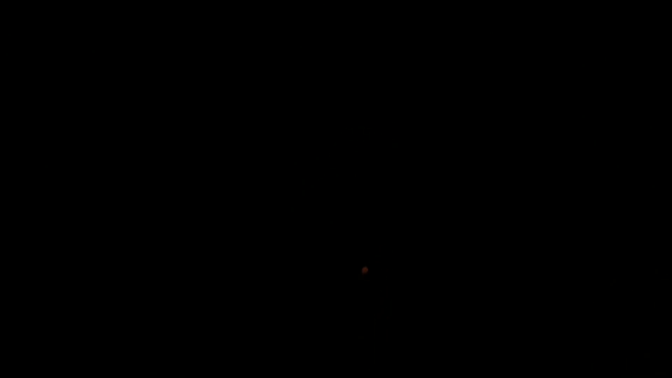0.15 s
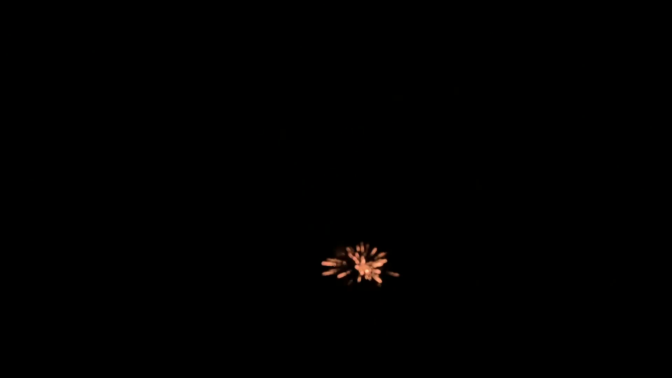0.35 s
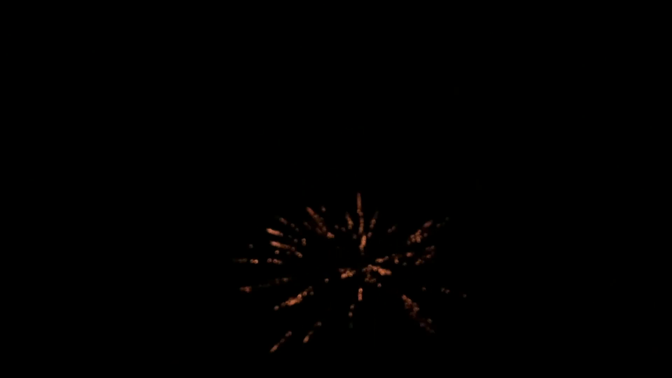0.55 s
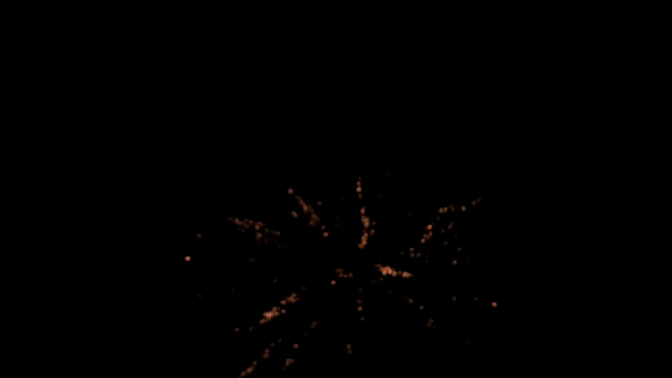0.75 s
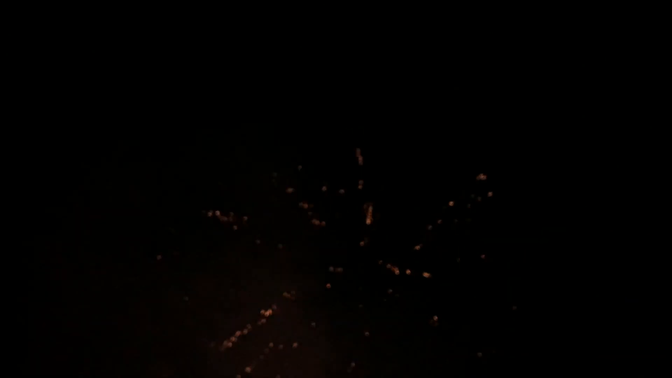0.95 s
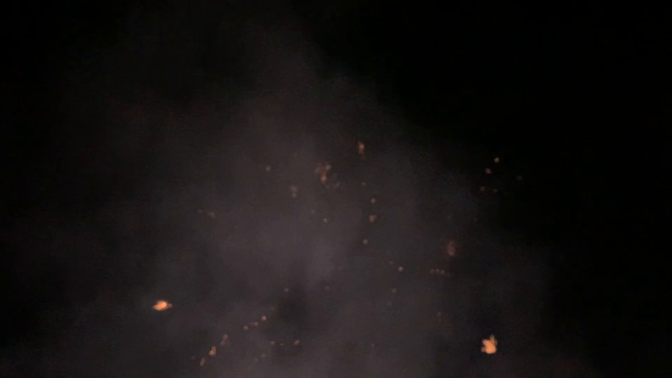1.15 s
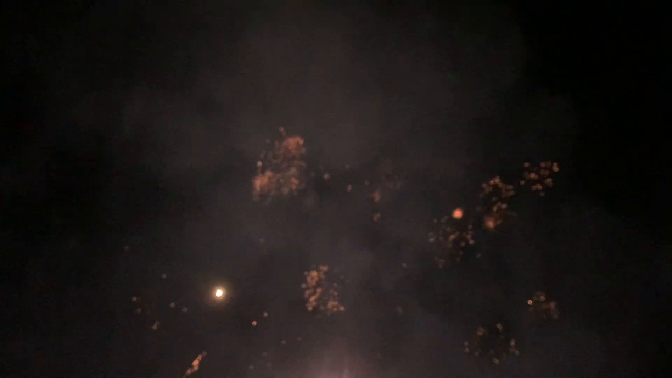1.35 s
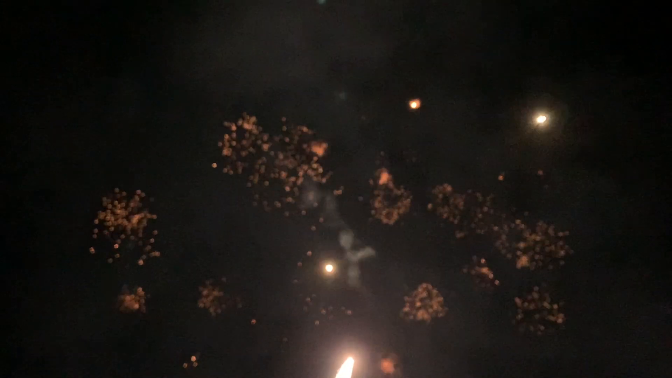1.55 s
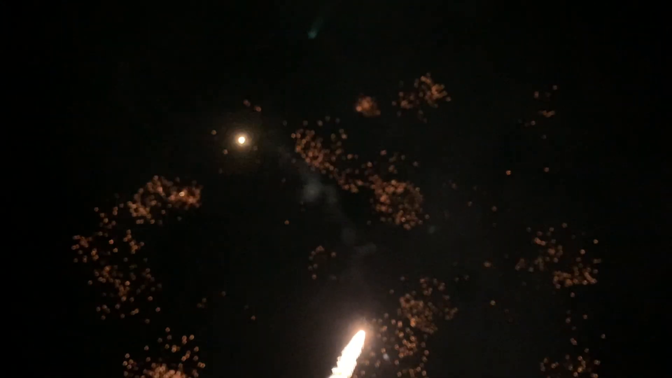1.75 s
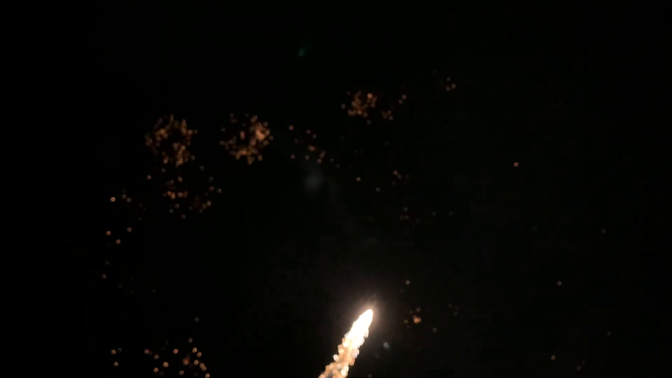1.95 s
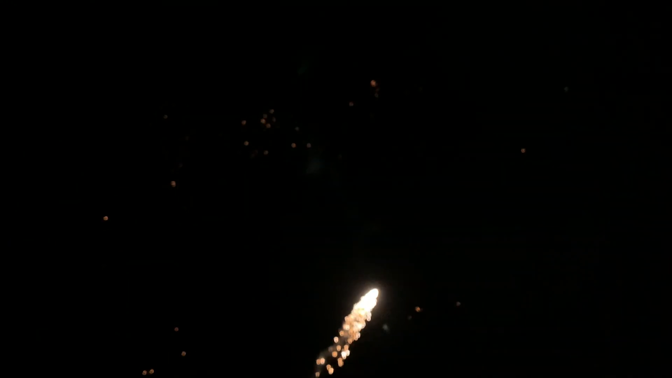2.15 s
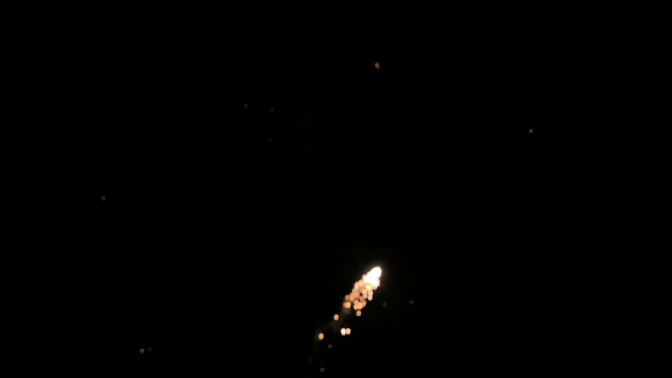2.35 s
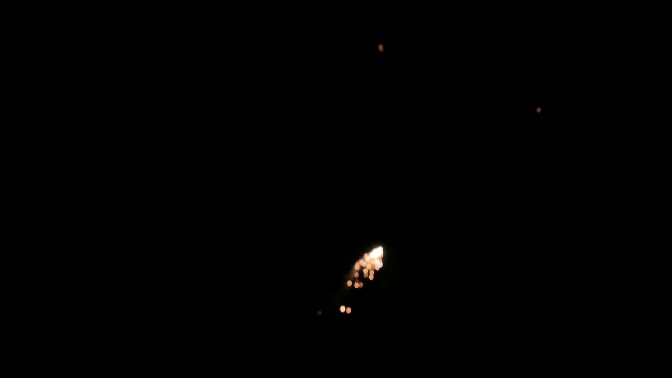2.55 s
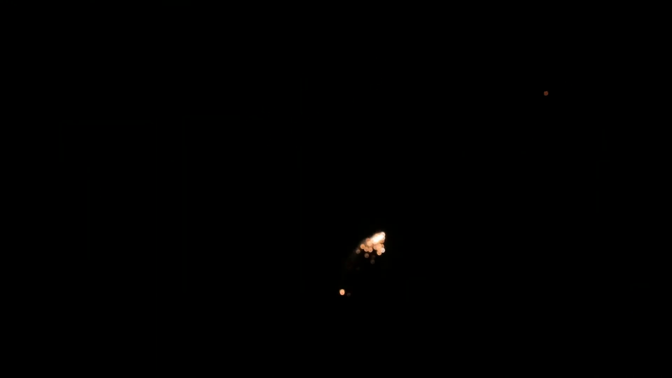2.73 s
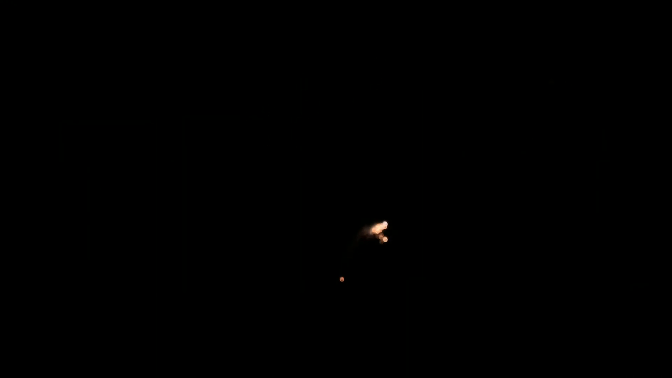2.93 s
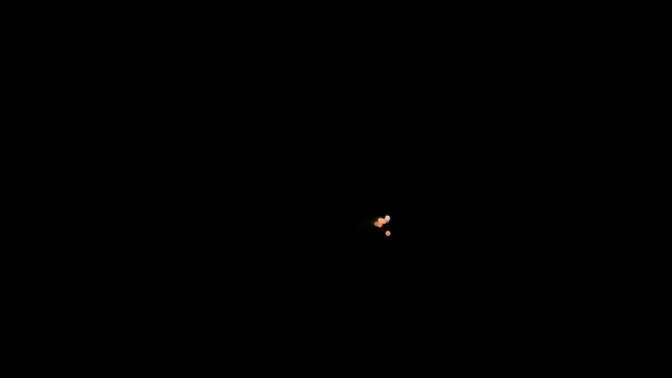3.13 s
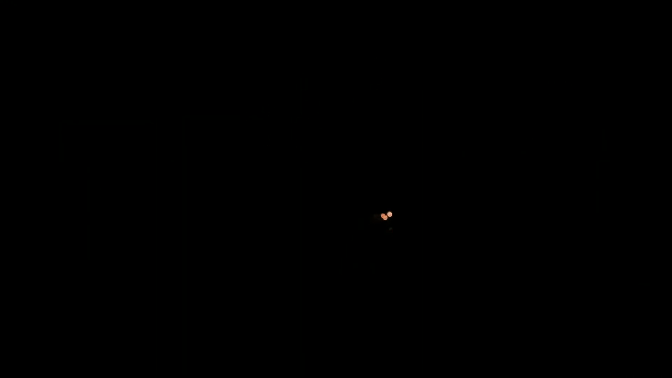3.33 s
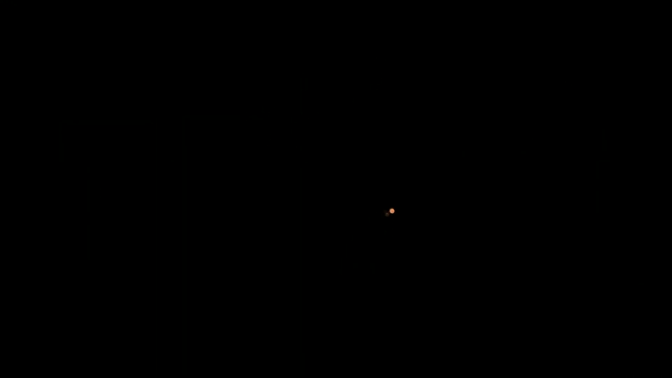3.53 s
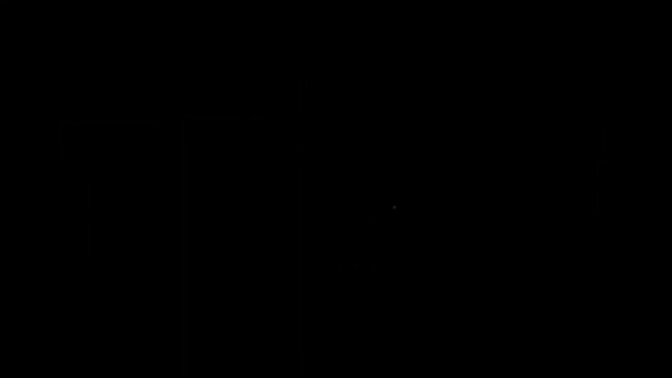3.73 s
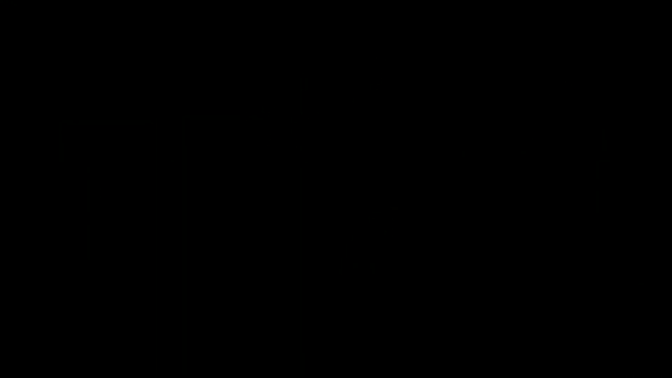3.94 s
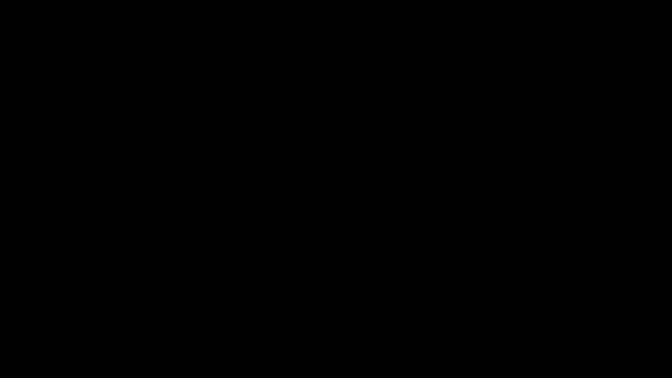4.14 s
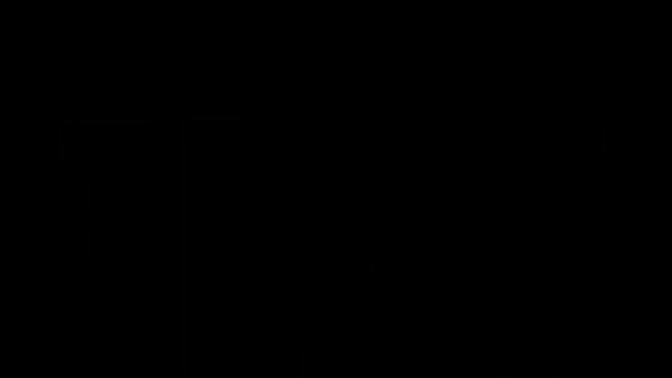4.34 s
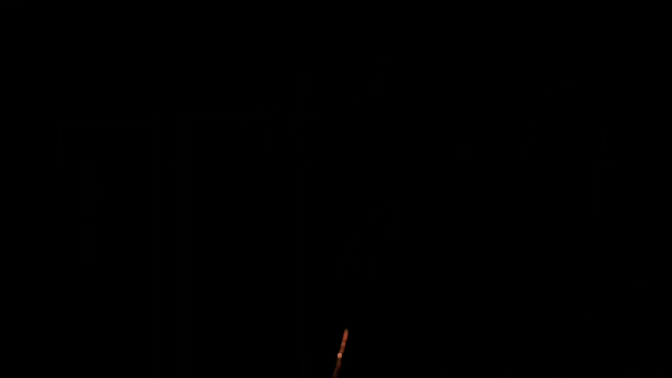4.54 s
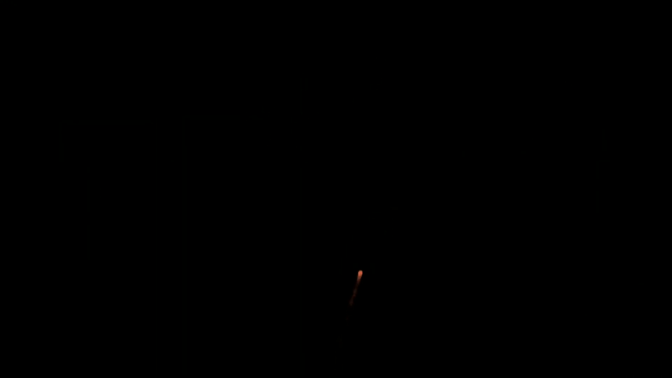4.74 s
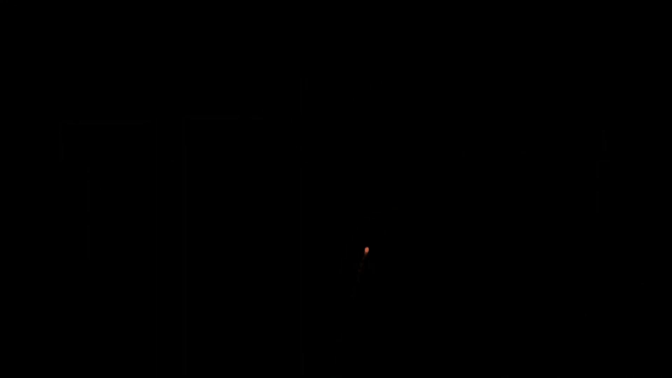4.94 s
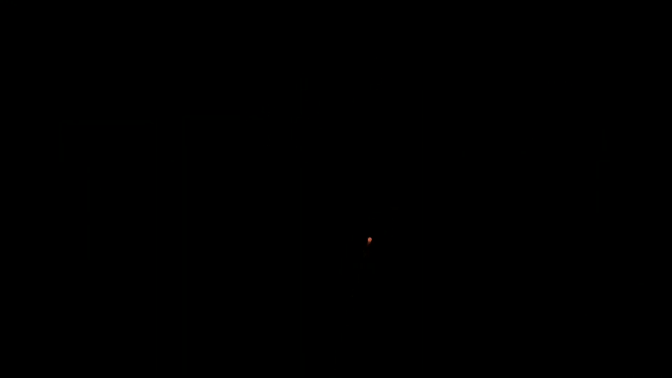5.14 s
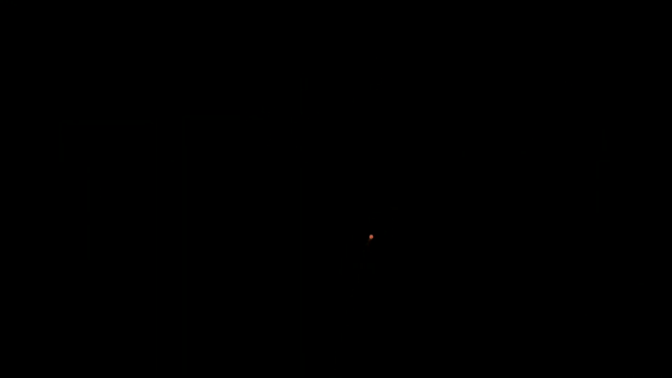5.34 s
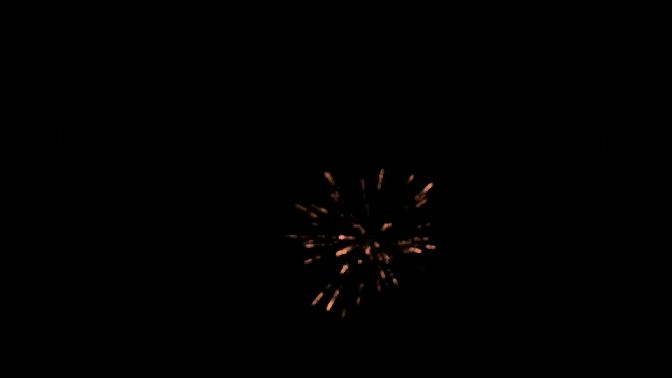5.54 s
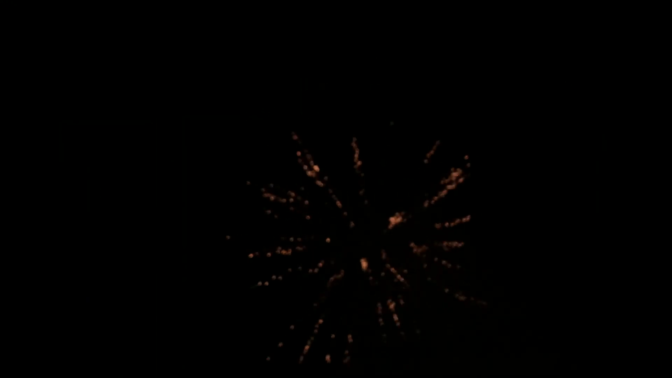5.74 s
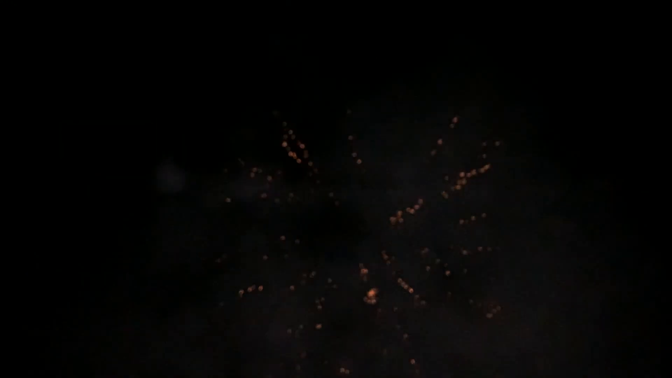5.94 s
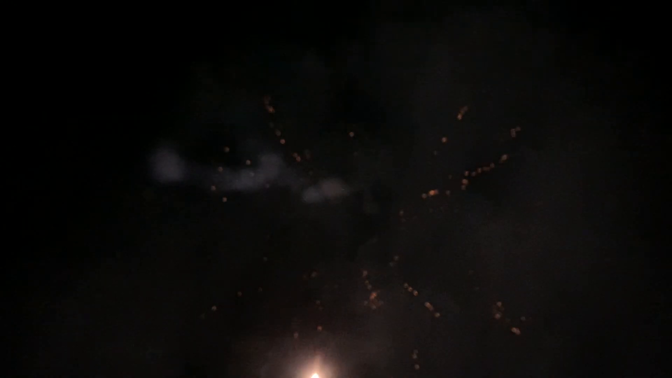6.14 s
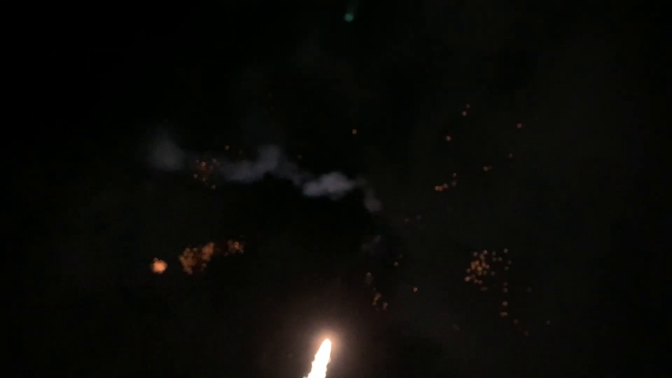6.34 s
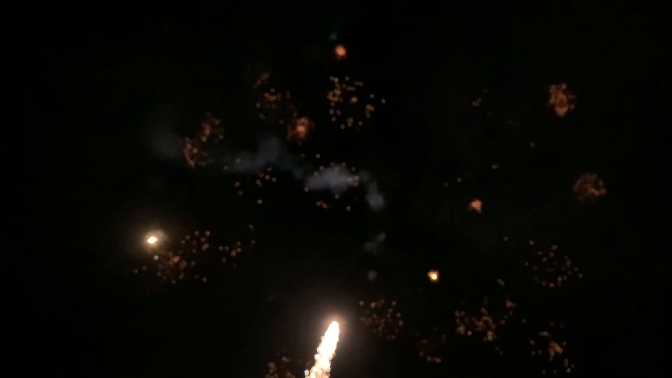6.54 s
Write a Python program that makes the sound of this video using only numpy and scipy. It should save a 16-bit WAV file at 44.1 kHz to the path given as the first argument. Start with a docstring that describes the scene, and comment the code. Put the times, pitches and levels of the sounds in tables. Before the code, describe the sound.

Firework candle at night: sharp overhead bangs and low tube thumps, bursts of dense crackling stars, and echoes rolling away into quiet air.

```python
"""Firework candle at night

A firework candle fires outdoors, close to a stereo microphone: lift charges and comets thump out of tubes.
Shells burst overhead and stars crackle in volleys; each report is a shock pulse, a gas rush and a low ring.
A dull repeat follows at once, then the ground's slap; decaying noise, convolved with the shots, reverberates.
Shaped noise makes the hiss of fuse, embers and sparks, the ticks, the rumble under dull thuds and the night air."""
import sys
import numpy as np
from scipy import signal
from scipy.fft import rfft, irfft, next_fast_len
from scipy.io import wavfile

SR = 44100
rng = np.random.default_rng(int(sys.argv[2]) if len(sys.argv) > 2 else 0)


def int16_out(signal):
    """Quantize to a 16-bit WAV file."""
    q = np.round(np.clip(np.atleast_2d(signal).T, -1, 1) * 32767)
    wavfile.write(sys.argv[1], SR, q.astype(np.int16))


N = 290178
TIME = np.arange(N) / SR
SIZE = 8192  # samples in one short sound
AROUND = (np.arange(SIZE) - SIZE // 2) / SR  # its time axis [s], zero at its centre
HZ = np.fft.rfftfreq(SIZE, 1 / SR)
GROUND_S, REPEAT_S = 0.0117, 0.0022  # delays of the ground echo and of the dull repeat [s]
TOP_HZ = 15900  # upper band limit of the microphone


def undb(db):
    """Level law: 20 dB is a tenfold amplitude."""
    return 10 ** (np.asarray(db) / 20)


def over_hz(hz, points, axis=1):
    """Spectral interpolation: a table column joined by straight lines over log frequency."""
    points = np.array(points)
    return np.interp(np.log(hz + 1), np.log(points[:, 0]), points[:, axis])


def noise(colour, size):
    """Spectral shaping: white stereo noise is filtered to a colour and scaled to rms 1."""
    spectrum = rfft(rng.standard_normal((2, size)))
    x = irfft(spectrum * undb(over_hz(np.fft.rfftfreq(size, 1 / SR), colour)), size)
    return x / x.std()


def strength(x, db):
    """Sound exposure: a short sound gets the energy of one millisecond at this level."""
    energy = np.mean(np.sum(x ** 2, axis=-1))
    return x * undb(db) * np.sqrt(SR / 1000 / energy)


def pulse(gain, db, lag_s=0, pan_db=0, lead_s=0.014):
    """Impulse with a short lead-in, located by interaural time and level differences."""
    ears = np.array([[0.5], [-0.5]])
    delay_s = SIZE / 2 / SR + ears * lag_s
    x = irfft(gain * np.exp(-2j * np.pi * HZ * delay_s))
    lead_in = np.exp(-(np.minimum(AROUND, 0) / lead_s) ** 2)
    return strength(x * lead_in * undb(ears * pan_db), db)


def puff(colour, db, rise_s, fall_s):
    """Turbulence noise: a short random burst swells and fades exponentially."""
    envelope = np.exp(-np.maximum(-AROUND / rise_s, AROUND / fall_s))
    return strength(noise(colour, SIZE) * envelope, db)


def held(start_s, length_s, attack_s, release_s):
    """Envelope: a linear rise, a hold and an exponential release."""
    rise = np.clip((TIME - start_s) / attack_s, 0, 1)
    return rise * np.exp(-np.maximum(TIME - start_s - length_s, 0) / release_s)


def flutter(depth_db, count):
    """Amplitude modulation: the gain wanders through this many random levels over the scene."""
    knots = np.linspace(0, TIME[-1], count)
    return undb(depth_db * np.interp(TIME, knots, rng.standard_normal(count)))


def add(track, s, x):
    """Superposition: a short sound is summed into the track with its centre at s."""
    start = int(round(s * SR)) - SIZE // 2
    a, b = max(start, 0), min(start + SIZE, N)
    if b > a:
        track[:, a:b] += x[:, a - start:b - start]


# Spectrum of the night air: (frequency [Hz], relative level [dB])
AIR_COLOUR = [(25, 5), (70, 8.5), (150, -6), (400, -9), (700, -13.5), (1300, -16), (2500, -26),
              (5000, -27.5), (10000, -33.5), (16000, -43.5)]


def night_air():
    """Ambient noise: the still night air is a steady, coloured random hush."""
    return noise(AIR_COLOUR, N) * undb(-72)


# Fuses of climbing shells: (burst time [s], level [dB])
FUSES = [(.41, -75.5), (5.51, -74)]
# Spectrum of a fuse: (frequency [Hz], relative level [dB])
FUSE_COLOUR = [(200, -9), (400, -3.5), (700, -15.5), (1050, -12), (1350, 4), (1900, -21.5), (3300, -22),
               (4300, -5.5), (5100, -22.5), (6000, -13), (7200, -17.5), (8500, -24), (16000, -32.5)]


def fuses(flutter_db):
    """Combustion noise: a shell's fuse sputters softly through its climb until the burst."""
    flight_s, attack_s, release_s = 1.3, 0.3, 0.03
    burning = sum(undb(db) * held(s - flight_s, flight_s, attack_s, release_s) for s, db in FUSES)
    return noise(FUSE_COLOUR, N) * burning * flutter(flutter_db, count=200)


# Spectrum of a tick: (frequency [Hz], relative level [dB])
TICK_COLOUR = [(100, -12.5), (350, -0.5), (900, -1.5), (2000, -17), (6000, -32), (16000, -53)]


def ticks(spread_db, count):
    """Random impulses: faint dull ticks, one at a random moment in each equal time slot."""
    track = np.zeros((2, N))
    middle_db, from_s, until_s = -64, 1.6, 6.5
    for k, (wait, size) in enumerate(rng.random((count, 2))):
        s = from_s + (until_s - from_s) * (k + wait) / count
        add(track, s, puff(TICK_COLOUR, middle_db + spread_db * (size - 0.5), 0.0006, 0.002))
    return track


# Faint spits of embers: (time [s], level [dB], decay [s])
SPITS = [(2.919, -48.5, 0.0074), (2.941, -54, 0.002), (3.256, -55.5, 0.0028), (3.337, -52.5, 0.036),
         (3.406, -60.5, 0.0044)]
# Spectrum of spits and spark trails: (frequency [Hz], relative level [dB])
SPIT_COLOUR = [(200, -8.5), (1200, 3.5), (2500, -7), (4200, -4.5), (7000, -7), (10000, -23), (16000, -46.5)]


def spits():
    """Transient hiss: embers give noise puffs that rise four times as fast as they decay."""
    track = np.zeros((2, N))
    for s, db, decay_s in SPITS:
        add(track, s, puff(SPIT_COLOUR, db, decay_s / 4, decay_s))
    return track


# Spark trails of what leaves a tube: (start [s], level from which the fade begins [dB])
TRAILS = [(.844, -58.5), (4.183, -52.5), (5.68, -51.5)]


def trails():
    """Fading noise source: sparks sputter behind each shot, weaker as it climbs away."""
    rise_s, fade_db_per_s = 0.2, 40.5
    climb = 0
    for s, db in TRAILS:
        rise = np.clip((TIME - s) / rise_s, 0, 1)
        climb = climb + rise * undb(db - fade_db_per_s * np.maximum(TIME - s, 0))
    return noise(SPIT_COLOUR, N) * climb * flutter(depth_db=6.5, count=180)


# Dull low thuds: (time [s], level before the trim [dB])
THUDS = [(1.261, -24), (2.504, -37.5), (2.584, -24.5), (2.682, -35.5), (3.059, -30), (3.081, -30.5),
         (3.449, -36.5), (3.614, -33), (3.896, -31), (4.476, -28.5), (4.56, -27.5), (4.617, -25.5),
         (4.643, -24), (4.897, -25.5), (5.221, -30.5), (5.425, -29.5), (6.329, -26.5)]
# Spells of low rumble: (start [s], length [s], level [dB])
RUMBLES = [(1.25, .72, -55.5), (2.46, .23, -49), (3.245, .22, -57.5), (3.635, 0.16, -50), (4.25, .44, -48),
           (4.721, .26, -58), (5.0, .13, -48), (5.418, 1.4, -61.5)]
# Spectrum of thuds and rumble: (frequency [Hz], relative level [dB])
THUD_COLOUR = [(22, -17), (45, 1), (70, 9.5), (110, -0.5), (170, -12), (260, -28), (400, -44.5),
               (800, -78.5)]


def thuds(trim_db, roll_db, roll_s):
    """Low-frequency impulses: each thud has a short noise roll, over spells of uneven rumble."""
    track = np.zeros((2, N))
    gain = undb(over_hz(HZ, THUD_COLOUR))
    for s, db in THUDS:
        roll = noise(THUD_COLOUR, SIZE)[0] * np.exp(-((AROUND - 0.012) / roll_s) ** 2)
        thud = pulse(gain, db + trim_db, 0.0017 * rng.standard_normal(), lead_s=0.025)
        add(track, s, thud + strength(roll, db + roll_db))
    mid, side = noise(THUD_COLOUR, N)
    # a weak side signal leaves the rumble nearly alike in both ears
    rumble = mid + undb(-17.5) * np.array([[1], [-1]]) * side
    spells = sum(undb(db) * held(s, length_s, 0.03, 0.03) for s, length_s, db in RUMBLES)
    return track + rumble * spells * flutter(depth_db=2.5, count=160)


def echoes(x, bands, swell_s, likeness, patchy_db, size):
    """Reverberation: countless reflections swell, then decay unevenly, each band at its own pace."""
    t, hz = np.arange(size) / SR, np.fft.rfftfreq(size, 1 / SR)
    mid, side = rfft(rng.standard_normal((2, size)))
    # the ears agree only at low frequencies
    alike = likeness / (1 + (hz / 1200) ** 2)
    left_right = np.array([[1], [-1]])
    spectrum = (mid * np.sqrt(1 + alike) + left_right * side * np.sqrt(1 - alike)) / np.sqrt(2)
    centres = np.geomspace(50, 16000, 10)
    knots = np.linspace(0, t[-1], 70)
    clumps = rng.standard_normal(len(knots))
    response = 0
    for centre, share in zip(centres, np.eye(len(centres))):
        swell = (1 - np.exp(-t / swell_s)) ** 2
        decay = np.exp(-np.log(1000) * t / over_hz(centre, bands, axis=2))
        # reflectors stand in clumps, so the echo comes in surges
        surges = 0.5 * clumps + rng.standard_normal(len(knots))
        fade = swell * decay * undb(patchy_db * np.interp(t, knots, surges))
        band = irfft(spectrum * np.interp(np.log(hz + 1), np.log(centres), share), size)
        response = response + band * fade / np.linalg.norm(fade) * undb(over_hz(centre, bands))
    return signal.fftconvolve(x.mean(axis=0, keepdims=True), response, axes=1)[:, :N]


# Late roll of the far landscape: (frequency [Hz], level [dB], 60 dB decay time [s])
ROLL_BANDS = [(60, -26, 1.1), (300, -23, 0.78), (750, -15, 0.64), (2000, -13.5, 0.97), (5000, -18.5, 0.63),
              (12000, -32, .5)]


def late_roll(bursts):
    """Distant reverberation: only what explodes high up is heard by the far landscape."""
    return echoes(undb(-4.5) * bursts, ROLL_BANDS, swell_s=0.26, likeness=0.3, patchy_db=2.5, size=65536)


# Far echoes: (frequency [Hz], level [dB], 60 dB decay time [s])
FAR_BANDS = [(60, -16, 6.6), (150.4, -20.5, 2.5), (350, -17.5, 2.6), (820, -17.5, 1.8), (2000, -21, 2.1),
             (5000, -14, 0.85), (9000, -22.5, .85), (15000, -27.5, 0.46)]


def far_echoes(bursts, comets, lift, stars, distant):
    """Long reverberation: the surroundings roll every report and thud on."""
    sent = undb(-0.5) * bursts + undb(-3) * comets + undb(-1.5) * lift
    sent = sent + undb(-5.5) * stars + undb(-9.5) * distant
    return echoes(sent, FAR_BANDS, swell_s=0.0051, likeness=0.15, patchy_db=3.0, size=98304)


# Nearby scatter: (frequency [Hz], level [dB], 60 dB decay time [s])
NEAR_BANDS = [(60, -7.5, 0.27), (150, -7.5, .13), (498.3, -12.5, 0.26), (1500, -5.5, 0.1),
              (5060, -0.5, 0.12), (15255, -23, .16)]


def near_scatter(bursts, comets, lift, stars, embers):
    """Early scattering: the near surroundings return a dense, short echo."""
    sent = undb(-1) * bursts + undb(-3.5) * comets + undb(0.5) * lift
    sent = sent + undb(-3.0) * stars + embers
    return echoes(sent, NEAR_BANDS, swell_s=0.0055, likeness=0.15, patchy_db=3.5, size=16384)


# Stars crumbling into weaker grains: (start [s], length [s], grain level before spread and trim [dB])
STARS = [(1.249, 0.018, -28), (1.413, 0.088, -22.5), (1.516, .028, -22.5), (1.605, .05, -24.5),
         (1.664, .02, -24), (1.73, .024, -22.5), (6.39, .11, -25), (6.506, 0.04, -22)]


def sprays(count):
    """Random fragmentation: a star sheds grains at uneven steps, as (time, level, treble) rows."""
    spread_db, treble_db, treble_spread_db = 3, 2.5, 4
    grains = []
    for start_s, length_s, db in STARS:
        times = start_s + length_s * (np.arange(count) + rng.random(count)) / count
        size, bright = rng.standard_normal((2, count))
        levels = db + spread_db * np.minimum(size, 1)
        grains += zip(times, levels, treble_db + treble_spread_db * bright)
    return grains


# Loudest single grains: (time [s], level before the trims [dB], treble boost [dB])
GRAINS = [(1.213, -21, 4), (1.2432, -18, -2), (1.2651, -19.5, 12.5), (1.2949, -20, -1),
          (1.3033, -17.5, 4.5), (1.3502, -15.5, 1.5), (1.3707, -17.5, 0), (1.407, -17.5, 6.5),
          (1.4165, -16, 0.5), (1.4407, -18.5, 1), (1.4539, -17.5, 6.5), (1.4929, -13, 2.5),
          (1.5135, -17, 8.5), (1.5234, -9.5, 2.5), (1.5725, -15, 0), (1.5896, -13.5, 3.5), (1.6, -12.5, 7),
          (1.6281, -10.5, 7.5), (1.6563, -18, -1), (1.664, -12, 2), (1.6702, -15.5, 10), (1.702, -19.5, -3),
          (1.7196, -17.5, -1), (1.729, -17, -5.5), (1.7392, -11.5, 10), (1.8017, -15, -3.5),
          (1.85, -16, -6.5), (1.891, -12.5, -1), (6.322, -20.5, 3), (6.3825, -15.5, 1), (6.3996, -16.5, -2),
          (6.4177, -16.5, -3), (6.436, -20.5, 15), (6.456, -18, 8), (6.478, -13, 8), (6.4975, -14.5, -10),
          (6.512, -9.5, -2), (6.5169, -15, 1), (6.537, -13.5, 8), (6.542, -20.5, 15), (6.5787, -14, -8)]
# Spectrum of a grain: (frequency [Hz], relative level [dB])
POP_COLOUR = [(40, -20), (130, -1.5), (350, -3.5), (900, 2), (1500, 4), (2600, 0), (4500, -8), (7000, -12),
              (9500, -18), (11500, -35), (14500, -38.5), (16000, -39.5)]


def crackle(pop_db, grit_db, ground_db):
    """Small explosions: each grain of a star is one tiny gritty shock with a ground reflection."""
    track, carried = np.zeros((2, 2, N))
    colour = over_hz(HZ, POP_COLOUR)
    treble = HZ ** 2 / (HZ ** 2 + 3000 ** 2)
    knots = np.geomspace(500, 16000, 12)
    for s, db, treble_db in GRAINS + sprays(count=14):
        gain = undb(colour + treble_db * treble)
        lag, pan, height = rng.standard_normal(3)
        # no two grains have the same colour
        own = undb(4 * np.interp(HZ, knots, rng.standard_normal(len(knots))))
        shock = pulse(gain * own, db + pop_db, 0.00005 * lag - 0.00002, 2.6 * pan)
        add(track, s, shock + puff(POP_COLOUR, db + grit_db, 0.0013, 0.00079))
        # the ground swallows the treble of its echo
        slap = pulse(gain / (1 + (HZ / 4000) ** 2), db + ground_db, -0.0000031)
        add(track, s + GROUND_S + 0.00038 * height, slap)
        add(carried, s, pulse(gain, db))
    return track, carried


# Spectrum of the gas rush: (frequency [Hz], relative level [dB])
GAS_COLOUR = [(100, -5), (700, 4.5), (1400, 8), (2200, -5), (4000, 1.5), (7500, -7.5), (9000, -26.5),
              (11500, -38.5), (16000, -31)]


def reports(table, colour, carry, gas_rise_s, gas_fall_s, ring_s, ring_db, ring_spread, churn_db):
    """Blast wave: shock, gas rush, low after-ring and a dull repeat, reflected by the ground."""
    direct, far = np.zeros((2, 2, N))
    gain = undb(over_hz(HZ, colour))
    # the repeat holds only the low middle
    repeat_gain = gain * HZ ** 2 / (HZ ** 2 + 220 ** 2) / (1 + (HZ / 750) ** 4)
    after = np.maximum(AROUND, 0)
    ring_fade = (1 - np.exp(-after / 0.0013)) * np.exp(-(after / ring_s) ** 2)
    # the ring reaches the two ears out of step [rad]
    ring_phase = np.array([[-0.5], [0.5]]) * ring_spread
    for s, db, gas_db, repeat_db, ground_db, far_db, pan_db, ring_hz in table:
        ring = ring_fade * np.sin(2 * np.pi * ring_hz * after + ring_phase)
        shock = pulse(gain, db, -0.00012, pan_db)
        gas = puff(GAS_COLOUR, gas_db, gas_rise_s, gas_fall_s)
        churn = puff(colour, db + churn_db, 0.0011, 0.0095)
        # inverted, and mostly in the right ear
        repeat = pulse(repeat_gain, db + repeat_db, 0, -25.5)
        blast = shock + gas + churn + strength(ring, db + ring_db)
        blast = blast - np.roll(repeat, int(REPEAT_S * SR), axis=1)
        add(direct, s, blast)
        add(direct, s + GROUND_S, undb(ground_db - 8) * blast)
        add(far, s, pulse(undb(over_hz(HZ, carry)), db + far_db))
    return direct, far


# Lift charges: (time [s], shock level [dB], gas rush level [dB], dull right-ear repeat re shock [dB],
# ground echo re 8 dB below the blast [dB], sound sent to the surroundings re shock [dB],
# left minus right of the shock [dB], after-ring [Hz])
LIFTS = [(4.1828, 3, -5, -13.5, -24, -9.5, 0.0019, 69.35)]
# Spectrum of a lift charge: (frequency [Hz], relative level [dB])
LIFT_COLOUR = [(25, -18), (60, -3.5), (160, 2), (300, -3.5), (500, -7.5), (720, -66), (1400, -18.5),
               (2500, -35.5), (7000, -26.5), (16000, -64.5)]
# Part of a tube's shot that carries to the surroundings: (frequency [Hz], relative level [dB])
TUBE_CARRY = [(25, -14.5), (70, -0.5), (200, 4), (450, -6.5), (800, -13), (2000, -15.5), (4500, -24),
              (7000, -23.5), (11000, -37.5), (16000, -45)]


def lift_charges():
    """Muzzle blast: the charge that lifts a shell thumps out of its tube."""
    return reports(LIFTS, LIFT_COLOUR, TUBE_CARRY, gas_rise_s=0.0038, gas_fall_s=0.0022,
                   ring_s=0.04, ring_db=-7.5, ring_spread=2.4, churn_db=-10)


# Comets leaving their tubes: same columns as the lift charges
COMETS = [(0.8438, 0, -10, -7.5, -22.5, -5.5, -2, 133.4), (5.6803, 0.0085, -9, -16, -15.5, -2, -0.2, 87.94)]
# Spectrum of a comet's shot: (frequency [Hz], relative level [dB])
COMET_COLOUR = [(25, -22), (60, -0.5), (140, 8.5), (330, -5), (720, -19), (1200, -1), (2000, -15),
                (2900, -25), (4500, -33.5), (7000, -37), (11000, -50), (16000, -54)]


def comet_shots():
    """Muzzle blast: a comet leaves its tube with a low, ringing report."""
    return reports(COMETS, COMET_COLOUR, TUBE_CARRY, gas_rise_s=0.0035, gas_fall_s=0.0015,
                   ring_s=0.022, ring_db=-8.5, ring_spread=0.3, churn_db=-8.5)


# Shells bursting overhead: same columns as the lift charges
BURSTS = [(0.4106, -1, -13.5, 2, 2, 2.5, -3.5, 130), (5.5052, -25.5, -28, -16, -10.5, -14.5, 2.5, 130.7),
          (5.5165, 2, -12.5, -14, -9.5, -2.5, -2.5, 79.8)]
# Spectrum of a burst: (frequency [Hz], relative level [dB])
BURST_COLOUR = [(25, -25.5), (60, -12.5), (130, -2), (300, -4.5), (500, 4.5), (720, -9.5), (1100, -2),
                (1800, -14.5), (3000, -10), (5200, -36.5), (7500, -29), (12000, -42.5), (16000, -56.5)]
# Part of an overhead burst that carries to the surroundings: (frequency [Hz], relative level [dB])
CARRY_COLOUR = [(25, -21), (70, -2), (200, 0.5), (450, -2), (1000, -1), (2000, -13.5), (4000, -21.5),
                (7000, -22.5), (11000, -41), (16000, -46)]


def shell_bursts():
    """Free-air explosion: a shell bursts overhead with a sharp shock and a weak after-ring."""
    return reports(BURSTS, BURST_COLOUR, CARRY_COLOUR, gas_rise_s=0.0009, gas_fall_s=0.0019,
                   ring_s=0.015, ring_db=-21, ring_spread=0.6, churn_db=-15)


def scene():
    """Superposition: direct sounds, their echoes and the background add linearly."""
    background = night_air() + fuses(flutter_db=1.5) + ticks(spread_db=11, count=40)
    embers = spits() + trails()
    distant = thuds(trim_db=2.0, roll_db=-6.5, roll_s=0.018)
    stars, stars_far = crackle(pop_db=-3.0, grit_db=-4.5, ground_db=-12.0)
    lift, lift_far = lift_charges()
    comets, comets_far = comet_shots()
    bursts, bursts_far = shell_bursts()
    roll = late_roll(bursts_far)
    far = far_echoes(bursts_far, comets_far, lift_far, stars_far, distant)
    near = near_scatter(bursts_far, comets_far, lift_far, stars_far, embers)
    return background + embers + distant + roll + far + near + stars + lift + comets + bursts


def record(dry):
    """Dispersion and saturation: a lag of about one cycle sweeps bangs downwards; peaks overload."""
    size = next_fast_len(N + SR)
    lag_cycles, ceiling = 1.05, 0.95
    hz = np.fft.rfftfreq(size, 1 / SR)
    phase = 2 * np.pi * lag_cycles * np.log((hz + 8) / TOP_HZ)
    swept = irfft(rfft(dry, size) * np.exp(-1j * phase), size)[:, :N]
    limited = ceiling * np.tanh(swept / ceiling)
    low_pass = signal.ellip(8, 0.2, 70, TOP_HZ, fs=SR, output="sos")
    return signal.sosfilt(low_pass, limited)


dry = scene()
out = record(dry)
int16_out(out)
```